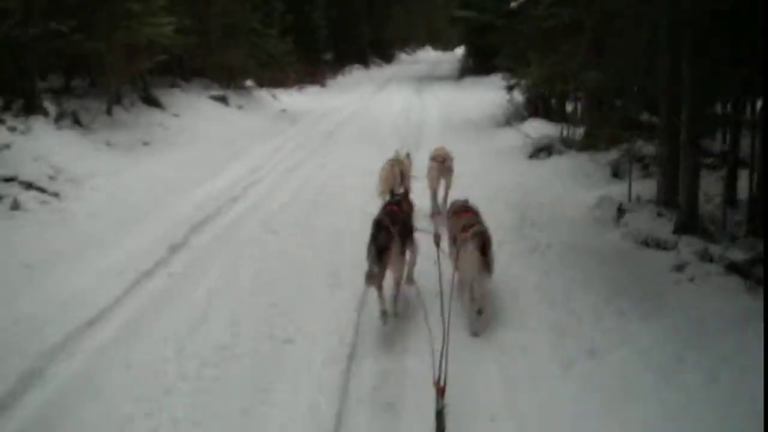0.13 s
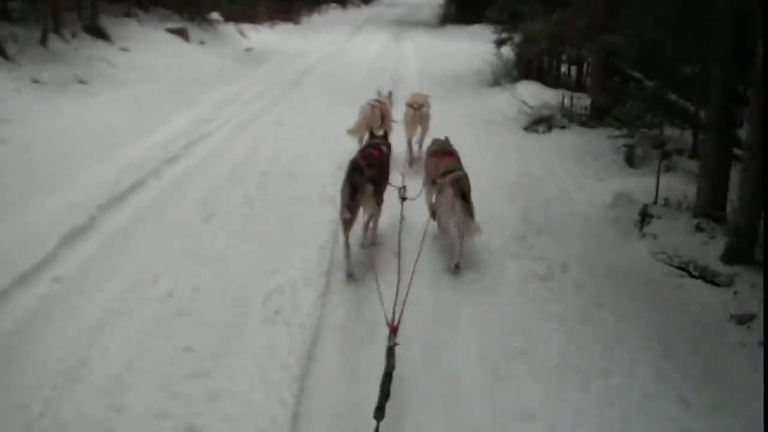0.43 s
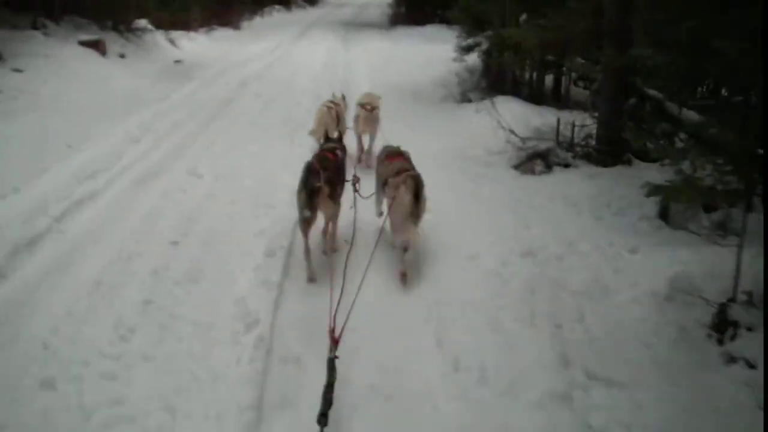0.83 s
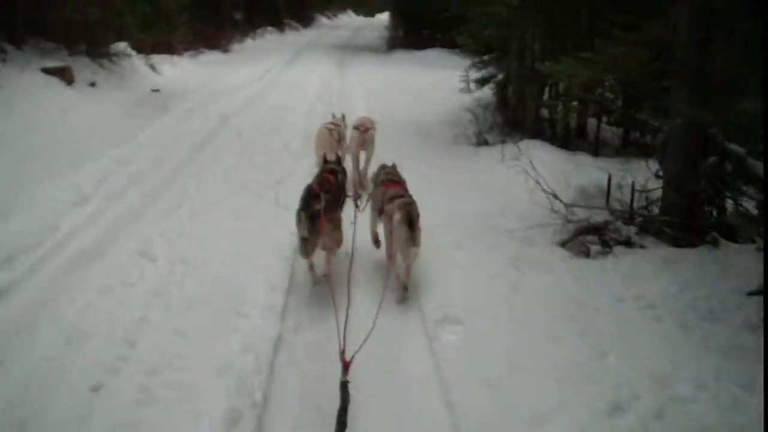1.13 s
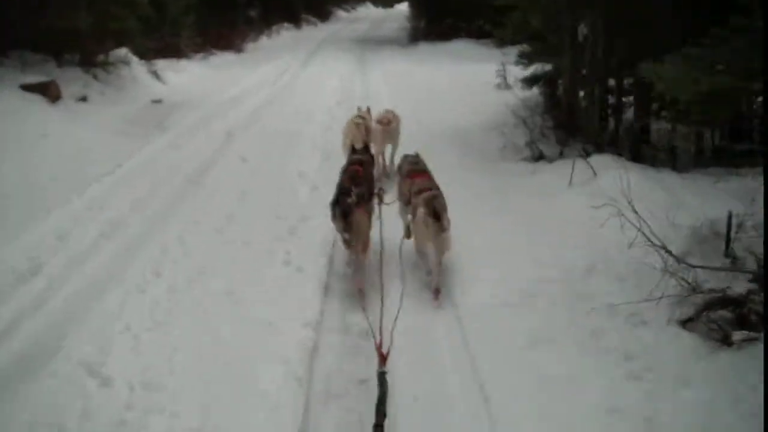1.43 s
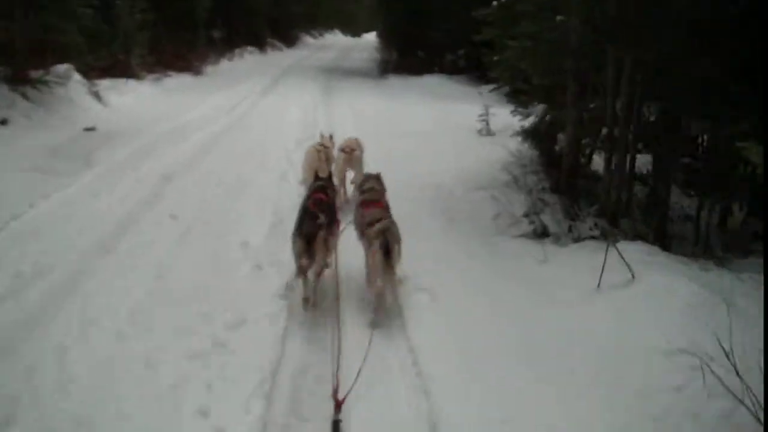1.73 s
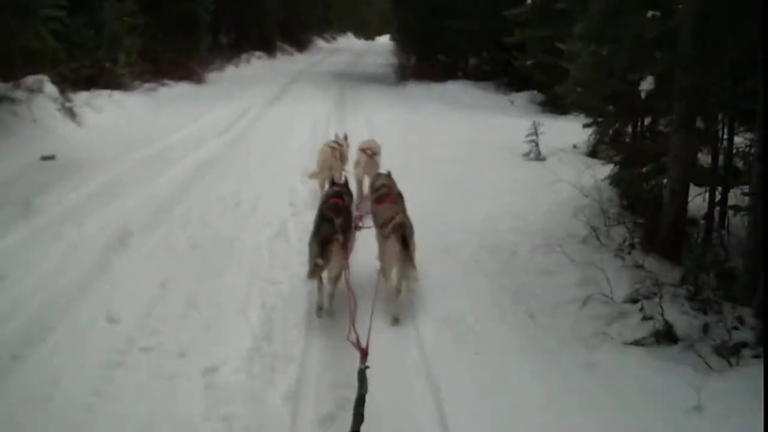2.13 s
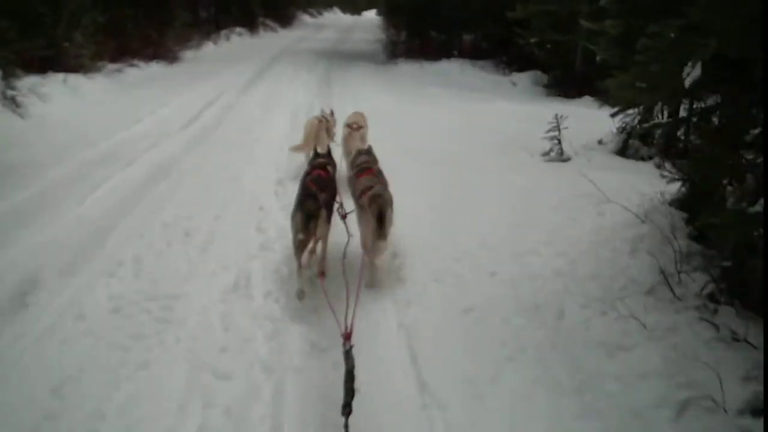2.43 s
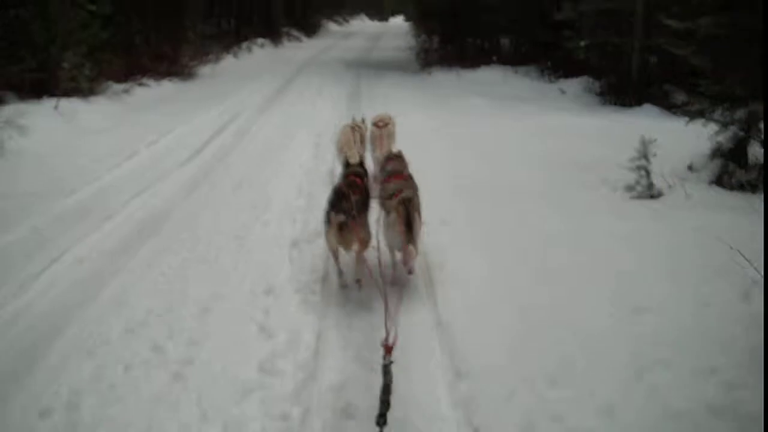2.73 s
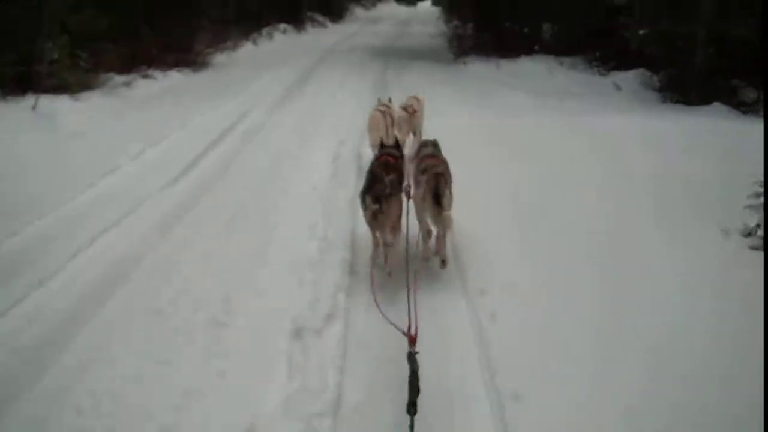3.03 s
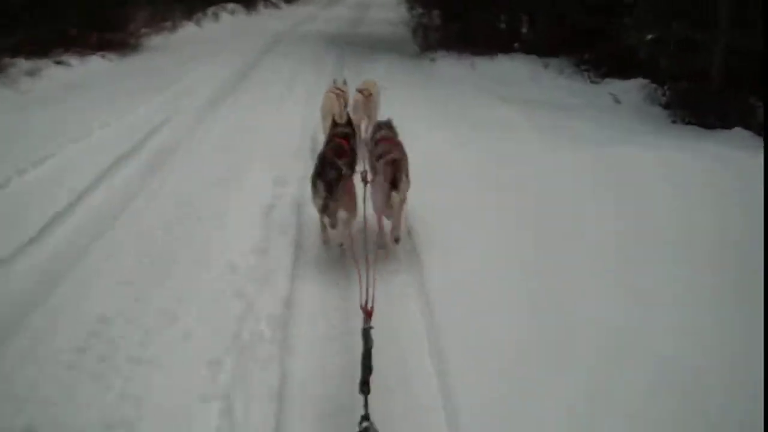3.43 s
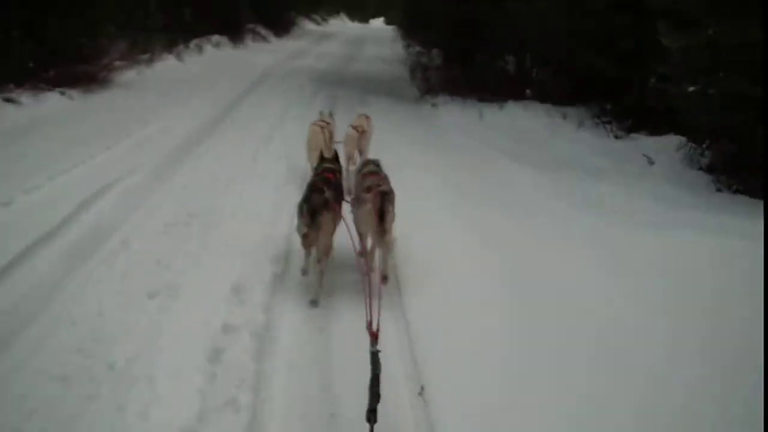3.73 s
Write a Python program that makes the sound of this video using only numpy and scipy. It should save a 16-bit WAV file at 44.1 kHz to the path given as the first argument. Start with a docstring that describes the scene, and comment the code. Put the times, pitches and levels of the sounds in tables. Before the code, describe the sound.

A dog sled slides along a snowy trail, heard from on board: rough hissing scrape swells and sinks, crust crunches, joints knock, metal briefly jingles near the start of the second second, with rumble and steady hiss beneath.

```python
"""Runners scrape and sing over snow as a dog sled runs along a forest trail, heard from the sled itself.
Snow grains breaking at random make the scrape, spray and grinding; friction makes narrow wavering tones.
Bumps thump the frame, its joints clack, crust crunches and a metal fitting jingles: these are decaying
noises and rings. Low rumble and steady hiss lie beneath, and one overloaded microphone clips the peaks."""
import sys
import numpy as np
from scipy import signal
from scipy.fft import rfft, irfft
from scipy.io import wavfile

SR = 44100
rng = np.random.default_rng(int(sys.argv[2]) if len(sys.argv) > 2 else 0)


def pcm_store(signal):
    """Save signal as 16-bit PCM."""
    levels = np.round(np.clip(np.atleast_2d(signal), -1, 1) * 32767)
    wavfile.write(sys.argv[1], SR, levels.astype(np.int16).T)


N = 171990
T = np.arange(N) / SR  # time of each sample, s

# tone colour of the sled frame: pitch_hz [Hz], level_db [dB, relative]
FRAME_TONE = [(20, 0), (48, -6), (63, 0.5), (80, -8.5), (120, -7), (165, 0.5), (215, 1.5), (265, 0),
              (320, -7.5), (420, -13), (700, -35.5), (4000, -57.5)]
TONE_ROUGHNESS = 0.78  # size of the random flutter in a rubbing tone, as a share of the tone


def undb(db):
    """Turn decibels into gain."""
    return 10 ** (np.asarray(db) / 20)


def unit(x):
    """Scale to an rms (average strength) of 1."""
    return x / np.std(x)


def curve(rows):
    """Join (time_s, value) rows with straight lines."""
    return np.interp(T, *np.array(rows).T)


def colour(x, points):
    """Filter through (pitch_hz, level_db) points without sounding early; the result has an rms of 1."""
    hz, db = np.array(points).T
    f = np.fft.rfftfreq(N, 1 / SR)
    gain = undb(np.interp(np.log(f + 1), np.log(hz), db))
    # folding the cepstrum onto positive times makes the filter respond only after its input
    cepstrum = irfft(np.log(gain), N)
    cepstrum[1:N // 2] *= 2
    cepstrum[N // 2 + 1:] = 0
    response = np.exp(rfft(cepstrum))
    return unit(irfft(rfft(x) * response, N))


def noise():
    """White noise: every pitch equally strong."""
    return rng.standard_normal(N)


def walk(hz):
    """Drift smoothly at random, up to about this rate, with a spread of 1."""
    f = np.fft.rfftfreq(N, 1 / SR)[:N // 100]
    random_parts = rng.standard_normal(len(f)) + 1j * rng.standard_normal(len(f))
    return unit(irfft(random_parts * np.exp(-(f / hz) ** 2) * (f > 0), N))


def bursts(rows, attack_s):
    """Sum envelopes from (start_s, level_db, decay_s) rows: a quick rise, then an exponential fall."""
    total = 0
    for start, db, decay in rows:
        rise = np.clip((T - start) / attack_s, 0, 1)
        fall = np.exp(-np.maximum(T - start - attack_s, 0) / decay)
        total = total + undb(db) * rise * fall
    return total


def ring(modes, start, length, scatter_db):
    """Strike (pitch_hz, level_db, t60_s) modes at one moment; each blow has its own balance."""
    age = np.maximum(T - start, 0)[:int(start * SR) + SR // 2]
    out = 0
    for hz, db, t60 in modes:
        gain = undb(db + scatter_db * rng.standard_normal())
        decay = np.exp(-np.log(1000) * age / (t60 * length))  # 60 dB down after t60 * length
        out = out + gain * np.sin(2 * np.pi * hz * age) * decay
    return np.pad(out, (0, N - len(out)))


def resonate(x, modes):
    """Pass a sound through (pitch_hz, width_hz, level_db) resonances; the result has an rms of 1."""
    total = 0
    for hz, width, db in modes:
        peak = signal.iirpeak(hz, hz / width, fs=SR)
        total = total + undb(db) * signal.lfilter(*peak, x)
    return unit(total)


def resonance(hz, wander, rough):
    """Rubbing drives a narrow tone whose pitch wavers and whose strength and phase flutter; rms about 1."""
    wander_hz, rough_hz = 60.14, 98  # rates of the pitch wavering and of the roughness
    phase = 2 * np.pi * np.cumsum(hz * (1 + wander * walk(wander_hz))) / SR
    in_step = np.sin(phase) * (1 + rough * walk(rough_hz))
    out_of_step = rough * np.cos(phase) * walk(rough_hz)
    return (in_step + out_of_step) / np.sqrt(.5 + rough ** 2)


def hiss():
    """Steady hiss is filtered noise; the faint electronic whine is one pure tone."""
    # tone colour of the hiss: pitch_hz [Hz], level_db [dB, relative]
    air_tone = [(100, 5), (4000, 9), (8000, 5), (12000, 3), (15500, 2)]
    air_db, whine_db, whine_hz = -43, -54, 7867
    whine = unit(np.sin(2 * np.pi * whine_hz * T))
    return undb(air_db) * colour(noise(), air_tone) + undb(whine_db) * whine


def rumble():
    """The frame rumbles all the time: low filtered noise whose level also flickers at random."""
    # level of the rumble before an overall trim: time_s [s], level_db [dB]
    rumble_level = [(0, -18), (.1, -18.5), (.25, -28.5), (.37, -28.5), (.46, -27.5), (.6, -24.5),
                    (.78, -20.5), (.86, -26), (1.05, -22), (1.3, -23), (1.43, -23), (1.58, -20),
                    (1.67, -19), (1.8, -24.5), (1.92, -22.5), (2.3, -19.5), (2.5, -21), (2.6, -16.5),
                    (2.67, -30), (2.85, -21), (3.08, -27), (3.3, -27.5), (3.35, -15.5), (3.39, -28.5),
                    (3.61, -26), (3.68, -19.5), (3.9, -23)]
    trim_db, flicker_db, flicker_hz = -0.16, 2.4, 62
    level_db = trim_db + curve(rumble_level) + flicker_db * walk(flicker_hz)
    return colour(noise(), FRAME_TONE) * undb(level_db)


def creaks():
    """Parts of the frame ring briefly and roughly under load."""
    # rings of the loaded frame: start_s [s], level_db [dB], decay_s [s], pitch_hz [Hz]
    creak_rows = [(0.049, -33.5, .17, 1217), (.1, -23, 0.0074, 700), (3.428, -13, 0.0096, 373),
                  (3.468, -18, 0.013, 595)]
    wander = 0.0148  # spread of the pitch, as a share of it
    total = 0
    for start, db, decay, hz in creak_rows:
        envelope = bursts([(start, db, decay)], attack_s=0.0011)
        total = total + envelope * resonance(hz, wander, TONE_ROUGHNESS)
    return total


def fitting():
    """A metal fitting pings when brushed; one hard jolt rattles it and rings its modes."""
    # light pings of the metal: start_s [s], level_db [dB], decay_s [s]
    ping_rows = [(.655, -30, 0.028), (.811, -24, 0.031)]
    # tone colour of the rattle: pitch_hz [Hz], level_db [dB, relative]
    rattle_tone = [(3500, 6), (4800, -2), (6200, 1), (7200, -11), (9000, -24), (11000, -53)]
    # modes of the fitting: pitch_hz [Hz], level_db [dB, before scatter], t60_s [s, before shortening]
    fitting_modes = [(4861, -1, .07), (5561, -13.5, .25), (6024, -17, .3), (6778, -22, .13),
                     (7009, -22, .07), (7677, -27, .17), (8285, -23, .18), (8985, -27, .11)]
    ping_hz, jolt_s = 5811, 1.213
    rattle_db, rattle_decay_s = -14, .011
    pings = bursts(ping_rows, attack_s=.001) * unit(np.sin(2 * np.pi * ping_hz * T))
    rattle_envelope = bursts([(jolt_s, rattle_db, rattle_decay_s)], attack_s=.001)
    rattle = rattle_envelope * colour(noise(), rattle_tone)
    jingle = ring(fitting_modes, jolt_s, length=.85, scatter_db=1)
    return pings + rattle + jingle


def crunches():
    """Snow crust crunches: short fading bursts of filtered noise."""
    # crunches of crust: start_s [s], level_db [dB], decay_s [s]
    crunch_rows = [(.078, -12, 0.0046), (.110, -15, 0.0065), (.214, -20, 0.0023), (.425, -16, 0.0046),
                   (.486, -19, 0.0043), (.987, -16, 0.0045), (1.167, -13.5, 0.0076), (1.176, -5, .0021),
                   (1.474, -13.5, 0.011), (1.492, -9.5, 0.0071), (1.582, -8.5, 0.0044), (1.765, -8, 0.0051),
                   (1.972, -22, .007), (2.502, -8.5, 0.017), (2.640, -10, 0.0025), (2.670, -12.5, 0.012),
                   (2.742, -5.5, 0.01), (3.045, -10, 0.0077), (3.212, -7, .0099), (3.425, -11.5, .011),
                   (3.455, -11, .0029), (3.636, -15, .0092)]
    # their tone colour: pitch_hz [Hz], level_db [dB, relative]
    crunch_tone = [(500, -13), (2000, -12.5), (3200, -8), (4400, 6), (5200, -8.5), (7000, -19), (9000, -33),
                   (14000, -109)]
    return bursts(crunch_rows, attack_s=0.0021) * colour(noise(), crunch_tone)


def clacks():
    """The frame's joints clack: a dry noise plus noise gathered round each joint's own pitch."""
    # clacks of the joints: start_s [s], level_db [dB], decay_s [s], pitch_hz [Hz]
    clack_rows = [(.987, -19, .0055, 1200), (1.490, -7, .005, 1400), (1.496, -11, .0036, 2200),
                  (1.722, -19, .017, 600), (2.423, -15, .0045, 1250), (3.142, -12, .005, 480),
                  (3.329, -17, .0056, 2400), (3.469, -14, .003, 650), (3.483, -15, .003, 1200),
                  (3.513, -14.5, .005, 1100), (3.5218, -3.5, .0025, 1800)]
    # tone colour of the dry part: pitch_hz [Hz], level_db [dB, relative]
    clack_tone = [(150, -11), (350, 8), (550, -8), (800, 3.5), (1000, -17), (1240, -4), (1560, 5.5),
                  (1950, -13), (2350, -2), (3100, -5.5), (5000, -14), (9000, -52)]
    joint_db, sharpness = -2, 1.2  # sharpness is pitch divided by width
    dry_noise = colour(noise(), clack_tone)
    out = 0
    for start, db, decay, hz in clack_rows:
        mode = [(hz, hz / sharpness, 0)]
        joint = undb(joint_db) * resonate(resonate(noise(), mode), mode)  # twice narrows the peak
        out = out + bursts([(start, db, decay)], attack_s=.0008) * (dry_noise + joint)
    return out


def bumps():
    """Each bump pushes on the frame for a moment, ringing its modes and leaving a noisy shudder."""
    # bumps: start_s [s], strength_db [dB], contact_s [s], ring_length [share of the modes' own time]
    bump_rows = [(.147, 0.5, 0.0028, 2), (.425, -7, .0019, 1), (.485, -6.5, 0.0062, 0.55),
                 (0.665, -9, 0.0035, 0.71), (.989, -5.5, 0.0016, 0.62), (1.029, -5, 0.0016, 0.46),
                 (1.082, -7, 0.0021, 0.7), (1.167, 5.5, .0036, 0.64), (1.184, -11, 0.0018, 1.5),
                 (1.493, 0, 0.0021, 0.95), (1.508, -8.5, 0.0024, 1), (1.721, -2.5, 0.0032, 1.1),
                 (1.74, -2, 0.0029, 0.65), (1.776, -7, 0.0033, 1.1), (2.710, -1, .0026, .7),
                 (2.95, -3, 0.003, 0.91), (2.975, -8, .0013, 0.84), (3.14, 5.5, 0.0034, 0.52),
                 (3.423, 4, 0.0028, 0.3), (3.468, -13, 0.0011, .6), (3.479, -2.5, 0.0039, 1),
                 (3.668, -8.5, 0.0038, 1.4)]
    # modes of the frame: pitch_hz [Hz], level_db [dB, before scatter], t60_s [s, before ring_length]
    frame_modes = [(147, -3, 0.028), (191.5, -2, 0.054), (213.2, -12, 0.24), (249, -6, 0.13),
                   (342, -6, 0.071), (550, -14.5, 0.06)]
    blow_db, rise_s = -2.5, 0.0034
    shudder_db, shudder_decay_s = -16.5, 0.071
    stiffness = signal.butter(2, 86, "high", fs=SR)  # weakens what lies below 86 Hz
    blows, shudder_rows = 0, []
    for start, db, contact, length in bump_rows:
        push = np.sin(np.pi * np.minimum(T[:SR // 100] / contact, 1))  # half a sine wave
        rise = np.clip((T - start) / rise_s, 0, 1)
        rung = rise * ring(frame_modes, start, length, scatter_db=2)
        blow = signal.lfilter(*stiffness, signal.oaconvolve(rung, push)[:N])
        blows = blows + undb(blow_db + db) * blow / np.abs(blow).max()
        shudder_rows.append((start, db, shudder_decay_s))
    shaking = signal.lfilter(*stiffness, colour(noise(), FRAME_TONE))
    shudder = bursts(shudder_rows, attack_s=0.0045) * shaking
    return blows + undb(shudder_db) * shudder


def singing():
    """Friction drives two narrow resonances; the lower stands out and steadies when the runners bite."""
    # level of the lower tone before trim and fade: time_s [s], level_db [dB]
    low_level = [(0, -17.5), (.035, -21), (.05, -14), (.073, -10), (.081, -3), (.1, -12), (.155, -7.5),
                 (.19, -42), (.7, -24.5), (.78, -16), (.85, -47), (1.14, -50), (1.2, -19), (1.26, -23),
                 (1.29, -13.5), (1.318, -8), (1.338, 0), (1.347, -7), (1.43, -20), (1.46, -23), (1.58, -37),
                 (1.72, -23), (1.8, -17), (1.835, -18), (1.86, -7), (1.91, -11), (1.95, -18), (2.04, -14.5),
                 (2.1, -29), (2.48, -20.5), (2.53, -17), (2.6, -13.5), (2.71, -27), (2.745, -4.5),
                 (2.753, -8), (2.765, -1), (2.784, -0.5), (2.795, -4), (2.806, -6), (2.82, -7),
                 (2.93, -18.5), (3.02, -12.5), (3.07, -20), (3.105, -3.5), (3.15, -18.5), (3.17, -7),
                 (3.2, -26), (3.33, -16), (3.56, -45), (3.65, -25), (3.9, -22)]
    # level of the higher tone before trim: time_s [s], level_db [dB]
    high_level = [(0, -29.5), (1.15, -35), (1.35, -21), (1.5, -33), (1.8, -17), (1.98, -23), (2.06, -16),
                  (2.2, -26), (2.34, -21), (2.45, -32), (2.6, -15), (2.7, -24), (2.8, -13), (3.2, -41),
                  (3.55, -37), (3.66, -22.5), (3.8, -21), (3.9, -25)]
    low_hz, low_trim_db, low_wander = 4420, -2.5, .006  # wander: spread as a share of the pitch
    high_hz, high_trim_db, high_wander = 4540, -0.5, 0.03
    lock_db = -3  # above this level the lower tone holds steadier
    onset_db = -23  # below this level the lower tone fades into the scrape
    low_db = curve(low_level)
    low_rough = TONE_ROUGHNESS / np.hypot(1, undb(low_db - lock_db) ** 2)
    fade = 1 / np.hypot(1, undb(onset_db - low_db))
    low = resonance(low_hz, low_wander, low_rough) * undb(low_trim_db + low_db) * fade
    high = resonance(high_hz, high_wander, TONE_ROUGHNESS) * undb(high_trim_db + curve(high_level))
    return low + high


def grains():
    """Snow crystals break as dense random clicks, a few much larger than the rest."""
    grains_per_s, spread_db = 2200, 2.3
    breaks = rng.random(N) < grains_per_s / SR
    size = undb(spread_db * np.minimum(rng.exponential(size=N), 5))
    return breaks * np.sign(noise()) * size


def crackle():
    """Bits of crust snap at random, each a very short, fading shower of fractures."""
    snaps_per_s, spread_db, decay_s = 110, 2.8, .0014
    size = undb(spread_db * np.minimum(rng.exponential(size=N), 2))
    snaps = (rng.random(N) < snaps_per_s / SR) * size
    return signal.lfilter([1], [1, -np.exp(-1 / (decay_s * SR))], snaps) * noise()


def patchy(x):
    """Each band of the sound swells and sinks on its own as the snow changes; the result has an rms of 1."""
    patch_db, patch_hz = 2.6, 25.9  # spread and rate of the swelling
    f = np.fft.rfftfreq(N, 1 / SR)
    centres = np.geomspace(400, 9000, num=14)  # Hz; neighbouring bands overlap
    spectrum = rfft(x)
    total = 0
    for share in np.eye(len(centres)):
        band = irfft(spectrum * np.interp(f, centres, share), N)
        total = total + band * undb(patch_db * walk(patch_hz))
    return unit(total)


def runners():
    """Snow grains grind, scrape and spray under the runners, all chattering together; crust crackles."""
    # levels of the scrape, the bright spray and the low grinding of packed snow, each before its
    # trim and the chatter: time_s [s], level_db [dB]
    scrape_level = [(0, -28), (.06, -19.5), (.16, -24.5), (.19, -32), (.25, -27), (.35, -34.5),
                    (.39, -27.5), (.47, -31), (.56, -29), (.63, -26.5), (.72, -27), (.785, -22), (.85, -27),
                    (1.0, -27), (1.14, -25), (1.2, -23), (1.24, -16), (1.265, -28), (1.31, -16),
                    (1.36, -22), (1.435, -19.5), (1.465, -41), (1.52, -24), (1.7, -28.5), (1.82, -28.5),
                    (1.86, -19.5), (2.0, -27), (2.14, -21.5), (2.25, -29.5), (2.35, -20.5), (2.41, -29),
                    (2.49, -23.5), (2.59, -14), (2.65, -24), (2.71, -28.5), (2.76, -14.5), (2.88, -16.5),
                    (2.96, -26.5), (3.05, -15), (3.15, -24), (3.26, -29), (3.34, -14.5), (3.38, -29),
                    (3.415, -17), (3.45, -31.5), (3.495, -22.5), (3.55, -34.5), (3.61, -29), (3.66, -17),
                    (3.73, -26.5), (3.9, -21)]
    spray_level = [(0, -27.5), (.08, -26), (.16, -28.5), (.3, -32.5), (.5, -41), (.7, -33.5), (.79, -26),
                   (.86, -33), (1.14, -33), (1.18, -25), (1.27, -24), (1.31, -17.5), (1.42, -27),
                   (1.47, -30), (1.53, -31), (1.7, -30), (1.82, -28.5), (1.88, -21.5), (2.15, -27),
                   (2.43, -28.5), (2.6, -23.5), (2.7, -27.5), (2.79, -17), (2.96, -27), (3.05, -20),
                   (3.17, -26), (3.25, -30), (3.32, -18.5), (3.38, -34), (3.42, -27.5), (3.59, -38),
                   (3.65, -24), (3.9, -23.5)]
    grind_level = [(0, -26), (.08, -24.5), (.16, -25.5), (.22, -34), (.36, -30), (.6, -30.5), (.78, -26.5),
                   (.86, -29.5), (1.14, -26.5), (1.22, -20), (1.44, -27), (1.62, -25), (1.85, -24),
                   (2.45, -26.5), (2.58, -22), (2.69, -29), (2.77, -20.5), (3.0, -25.5), (3.14, -25),
                   (3.25, -33), (3.34, -23), (3.6, -29), (3.66, -26.5), (3.9, -27.5)]
    # their tone colours: pitch_hz [Hz], level_db [dB, relative]
    scrape_tone = [(900, -18.5), (1800, -14.5), (2500, -7.5), (2850, -10.5), (3200, -3), (3700, -2),
                   (4150, 4), (4600, -3.5), (5000, -8.5), (6500, -17), (10000, -81)]
    spray_tone = [(3800, -23.5), (4400, -5), (4650, 2), (5000, 0), (5400, -11), (6200, -17.5), (7300, -21),
                  (8500, -20), (9600, -35), (15500, -41)]
    grind_tone = [(250, 11), (450, -7.5), (600, 2.5), (850, 7), (1050, 6), (1400, 4.5), (1800, 0.5),
                  (2800, -6.5), (5000, -2), (10000, -38)]
    # resonances of the runners that grinding rings: pitch_hz [Hz], width_hz [Hz], level_db [dB, relative]
    runner_modes = [(585, 35, -5), (729, 130, 3), (876, 50, -1), (1219, 44, 1), (1487, 73, -4.5),
                    (1913, 190, -2), (2346, 39, -3.5), (2755, 83, 1)]
    scrape_trim_db, spray_trim_db, grind_trim_db = 1.74, 1.5, -3.5
    crackle_db, ringing_db = -5, 0  # against the scraping and the grinding grains
    chatter_db, chatter_hz = 0.95, 67.5  # spread and rate of the shared flicker in level

    scraping = patchy(colour(grains(), scrape_tone))
    crackling = undb(crackle_db) * colour(crackle(), scrape_tone)
    scrape = (scraping + crackling) * undb(scrape_trim_db + curve(scrape_level))
    spray = colour(grains(), spray_tone) * undb(spray_trim_db + curve(spray_level))
    ringing = undb(ringing_db) * resonate(grains(), runner_modes)
    grinding = patchy(colour(grains(), grind_tone) + ringing)
    grind = grinding * undb(grind_trim_db + curve(grind_level))
    chatter = undb(chatter_db * walk(chatter_hz))
    return chatter * (scrape + spray + grind)


def scene():
    """Add all sources together, the same in both ears."""
    background = hiss() + rumble()
    knocks = creaks() + fitting() + crunches() + clacks() + bumps()
    mono = background + knocks + singing() + runners()
    return np.array([mono, mono])


def record(dry):
    """The recorder clips the loudest peaks and cuts the top of the treble."""
    clip_level, top_hz = 1.0, 15800
    doubled = signal.resample_poly(dry, 2, 1, axis=1)  # twice the rate leaves room for clipping overtones
    clipped = np.clip(doubled, -clip_level, clip_level)
    lowpass = signal.ellip(8, .1, 60, top_hz, fs=2 * SR, output="sos")
    return signal.sosfiltfilt(lowpass, clipped)[:, ::2]


dry = scene()
out = record(dry)
pcm_store(out)
```